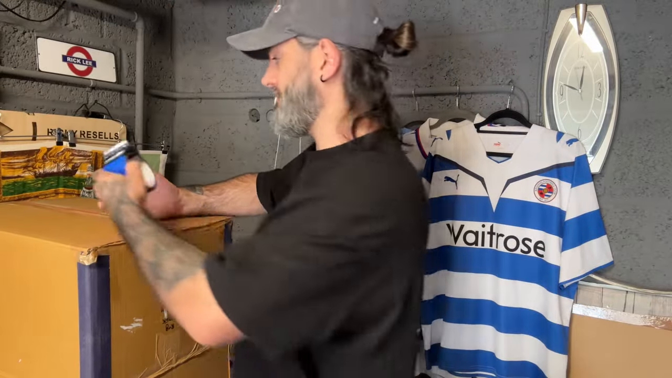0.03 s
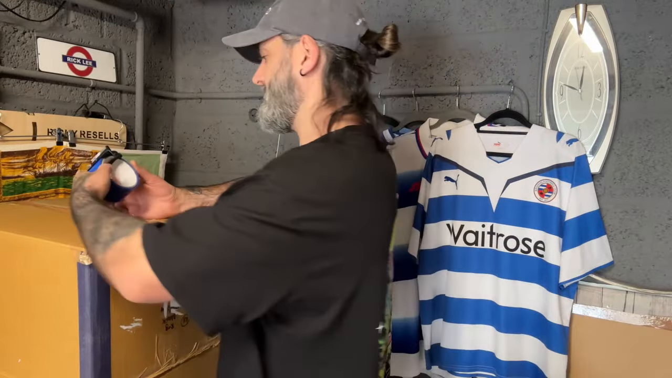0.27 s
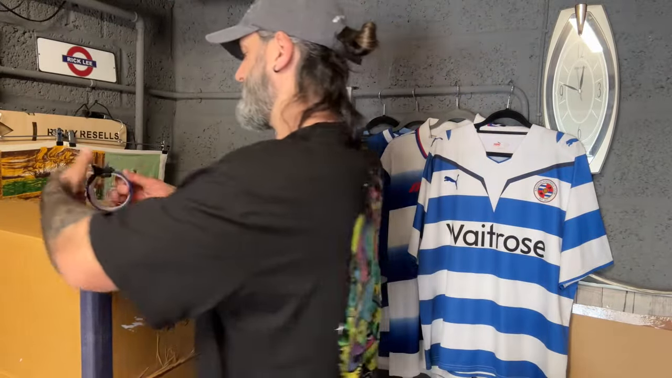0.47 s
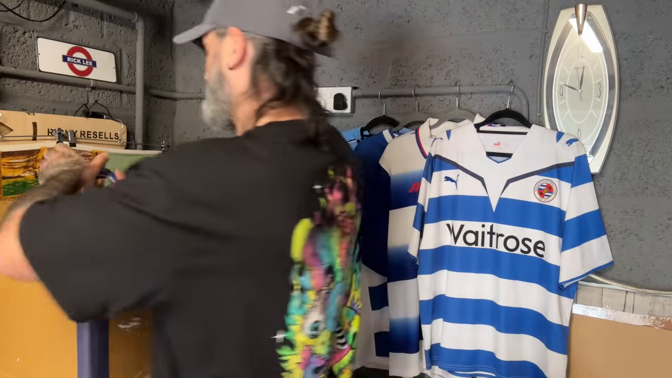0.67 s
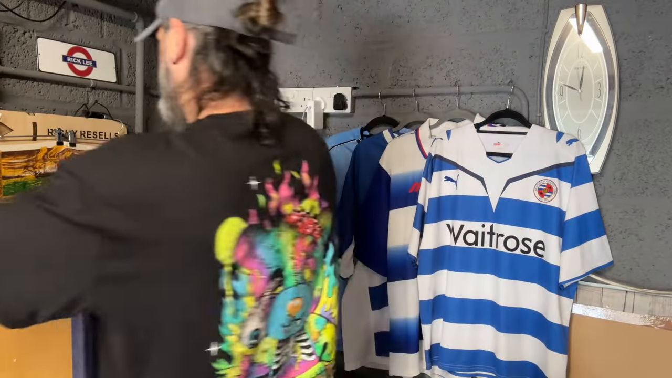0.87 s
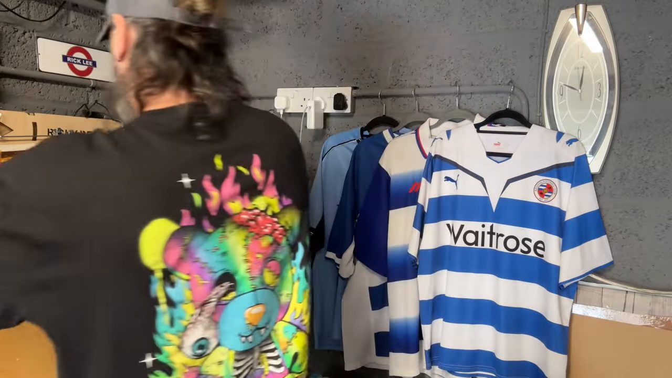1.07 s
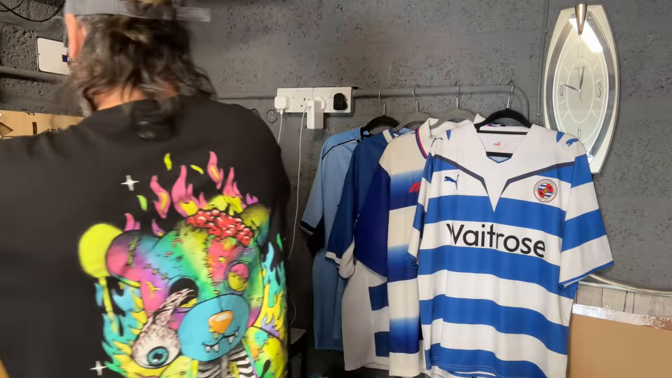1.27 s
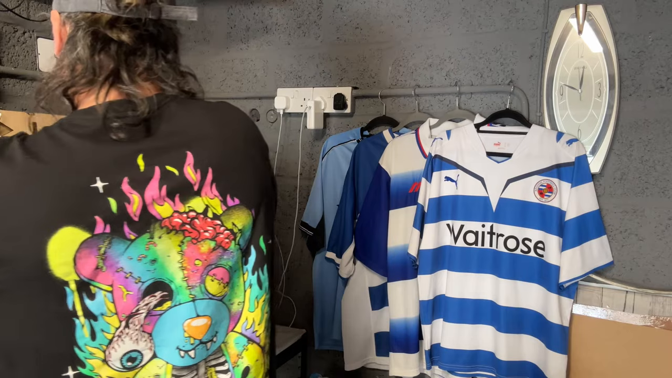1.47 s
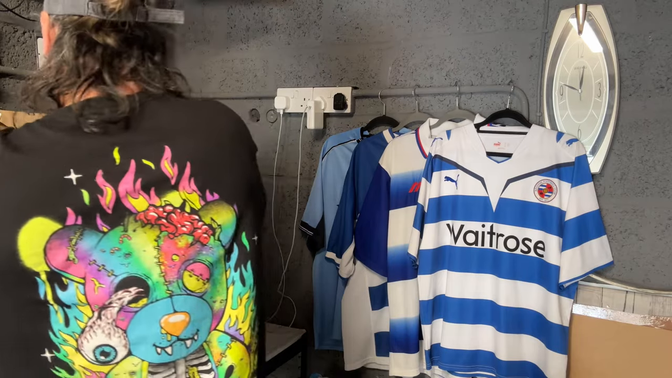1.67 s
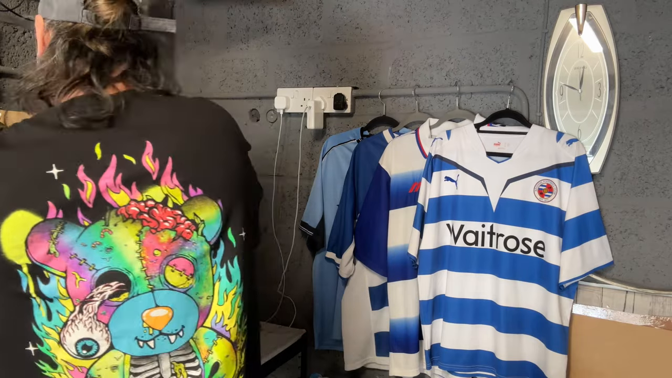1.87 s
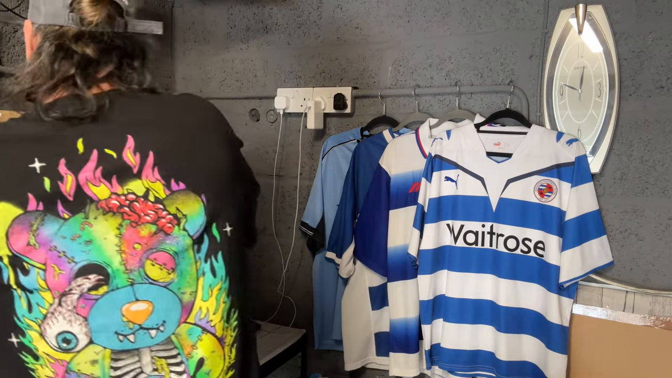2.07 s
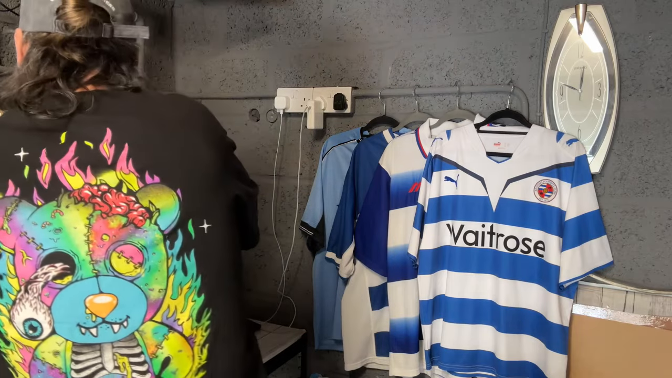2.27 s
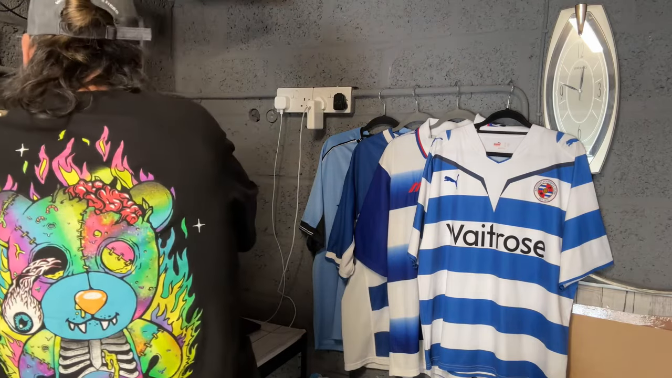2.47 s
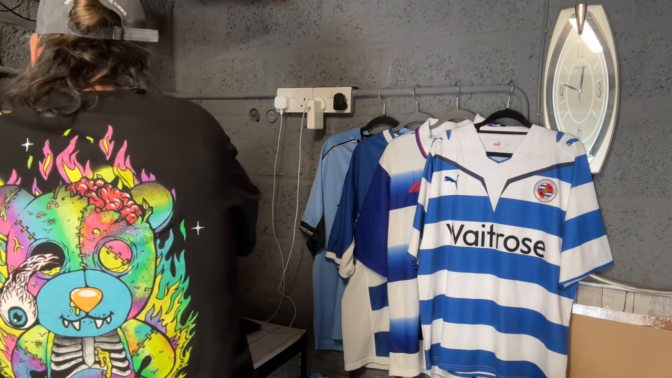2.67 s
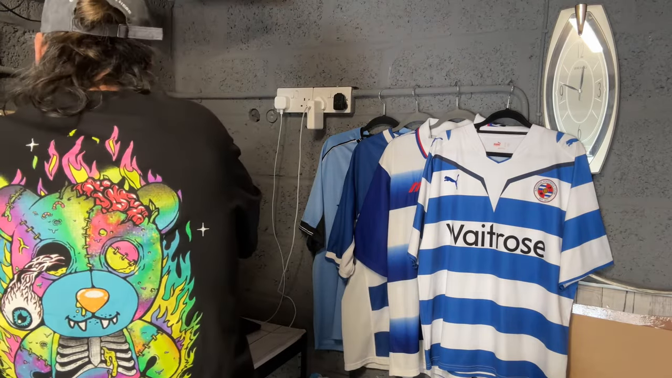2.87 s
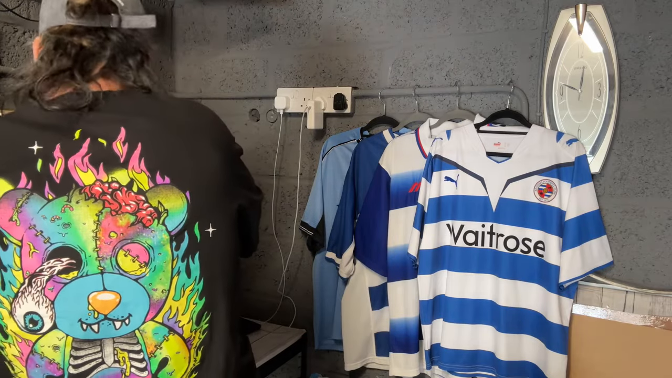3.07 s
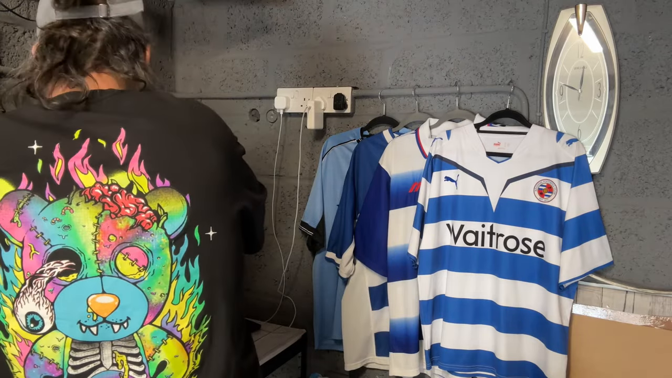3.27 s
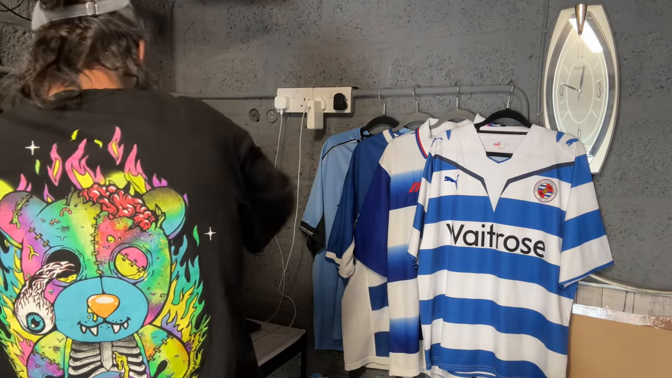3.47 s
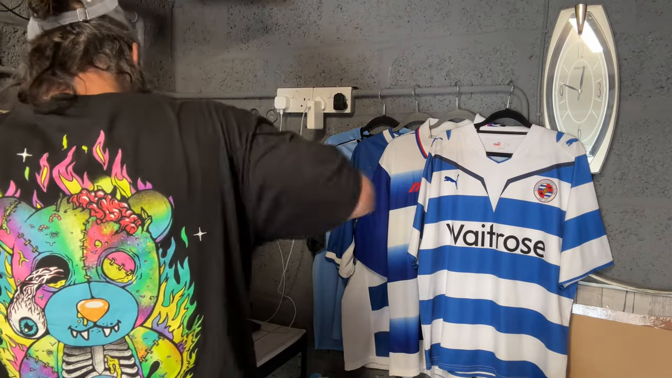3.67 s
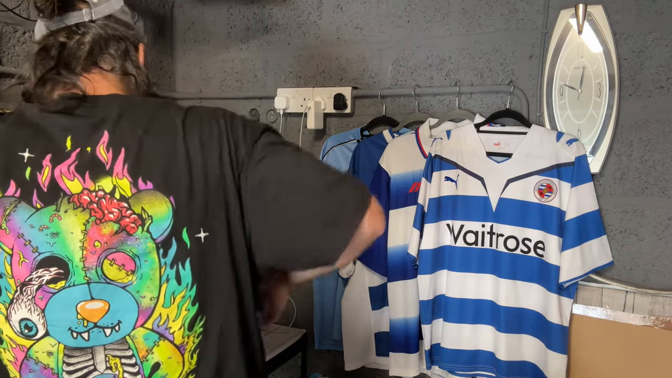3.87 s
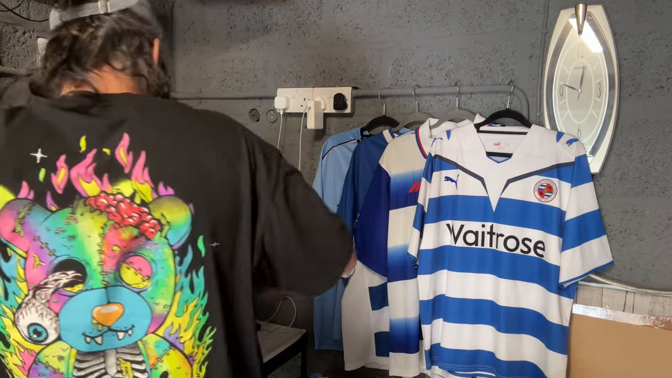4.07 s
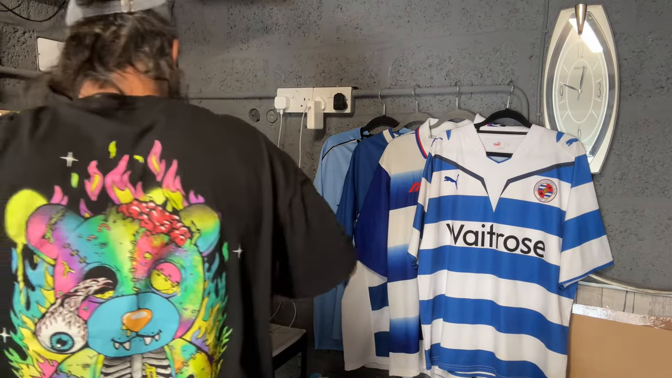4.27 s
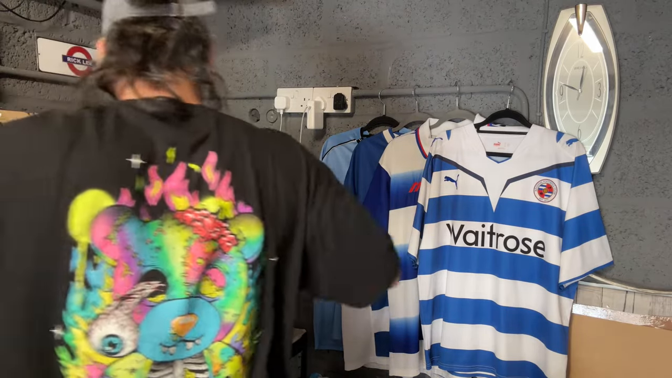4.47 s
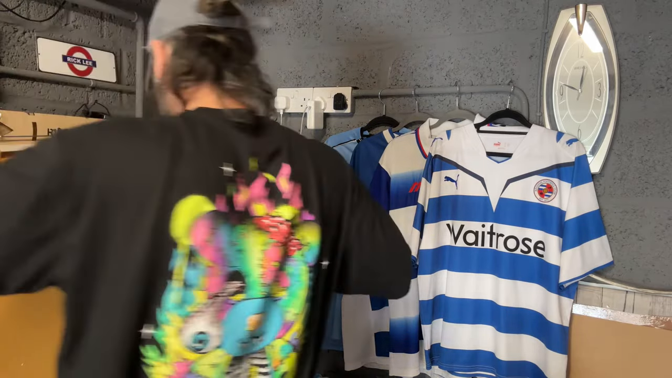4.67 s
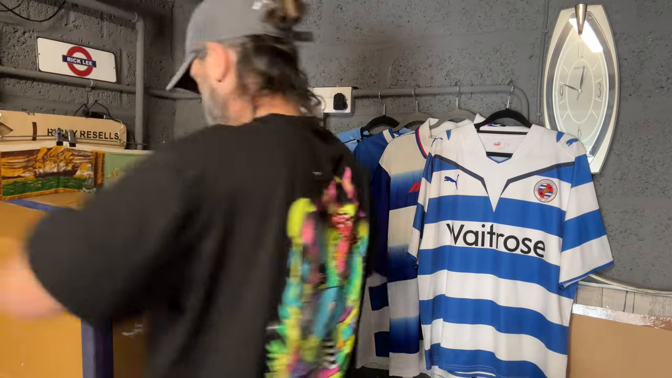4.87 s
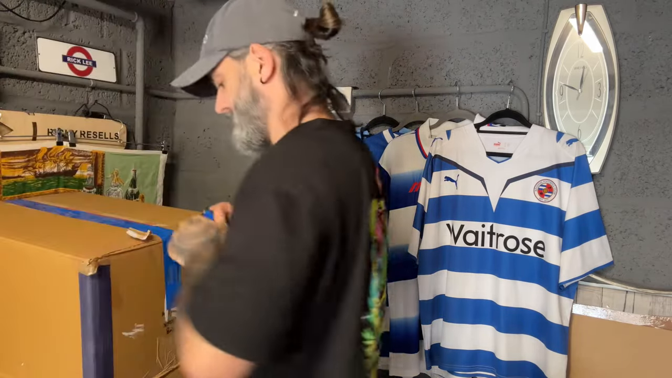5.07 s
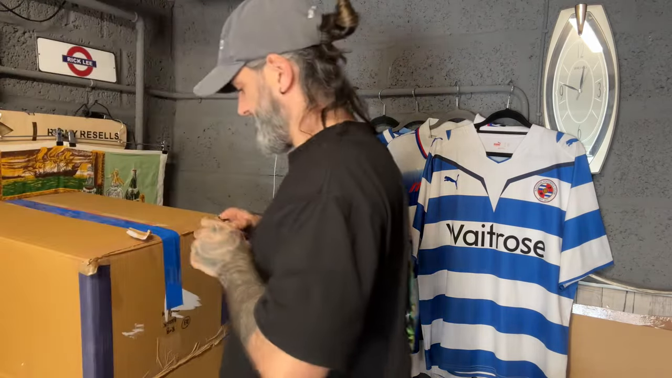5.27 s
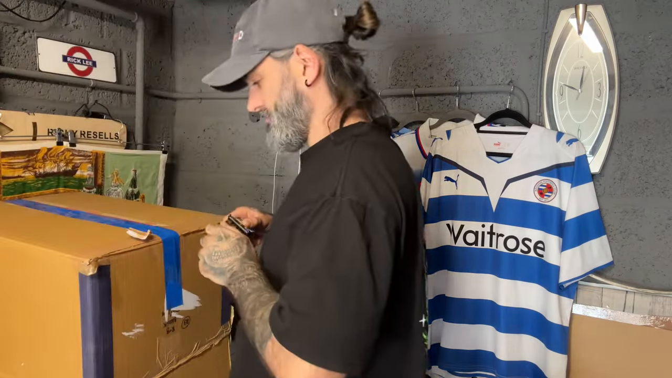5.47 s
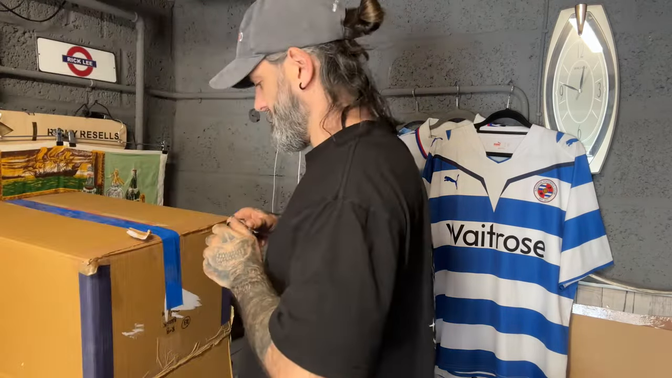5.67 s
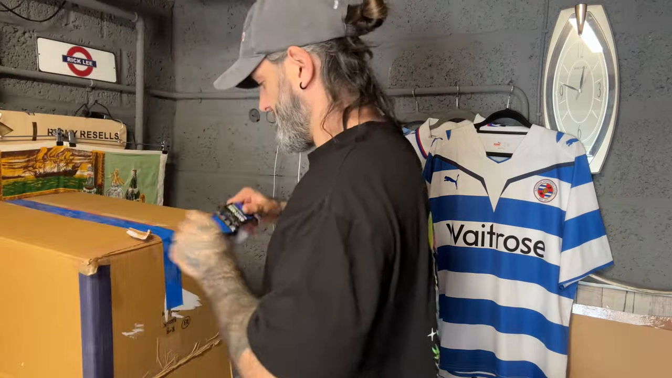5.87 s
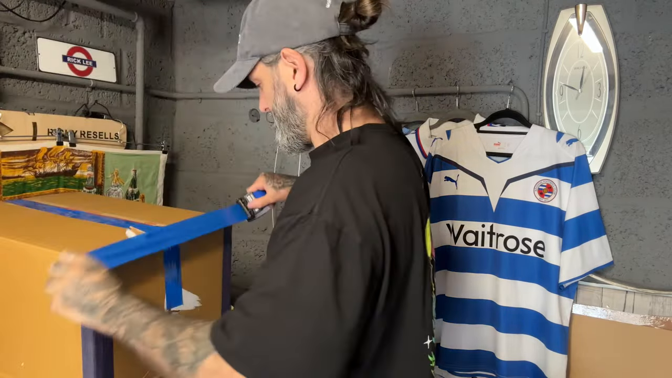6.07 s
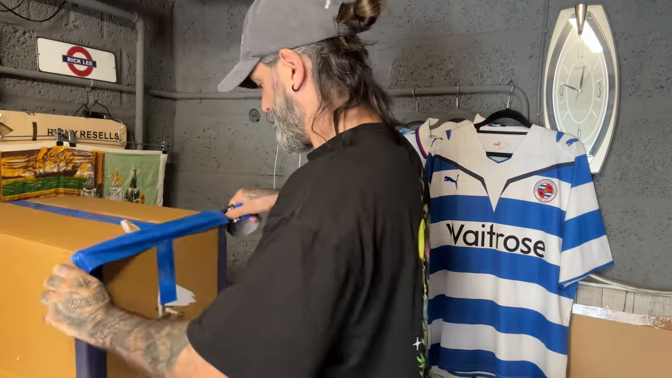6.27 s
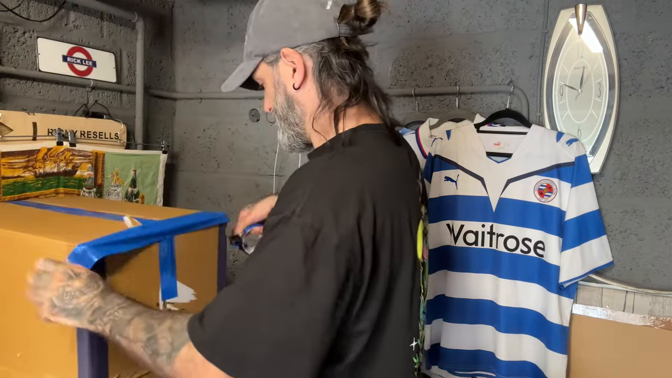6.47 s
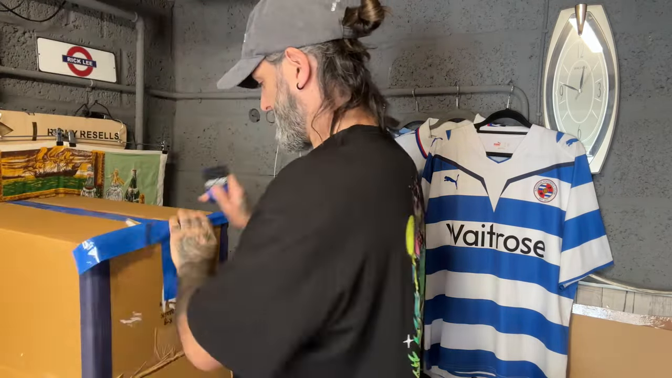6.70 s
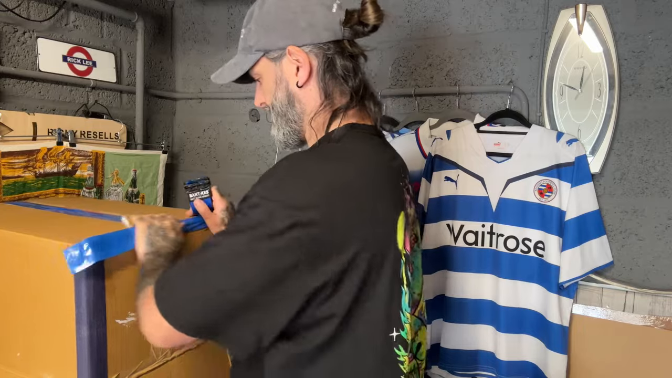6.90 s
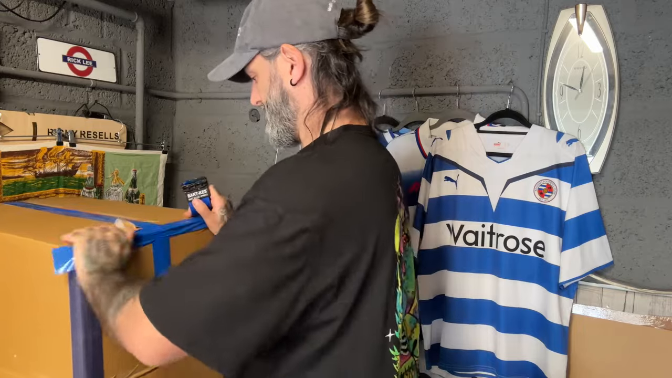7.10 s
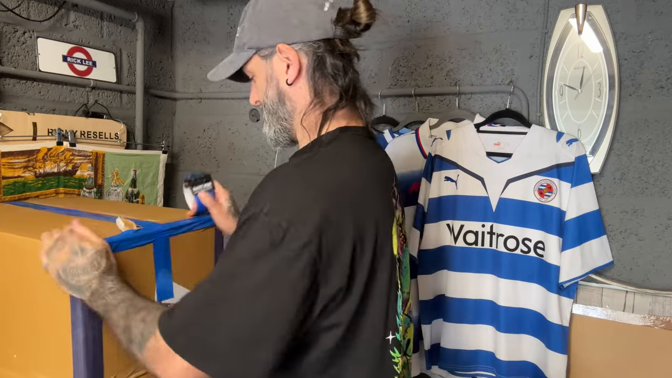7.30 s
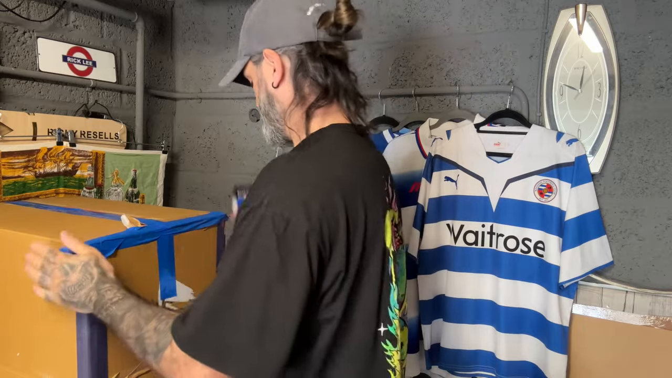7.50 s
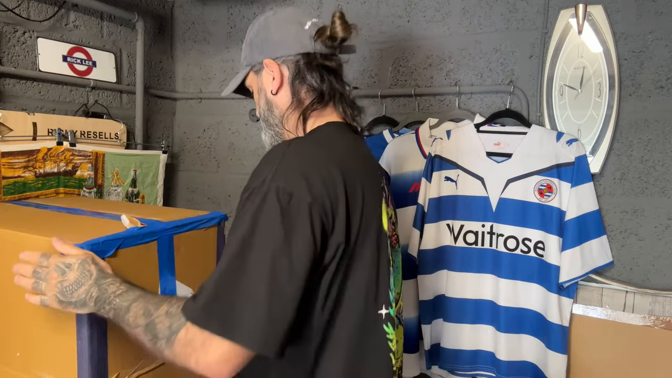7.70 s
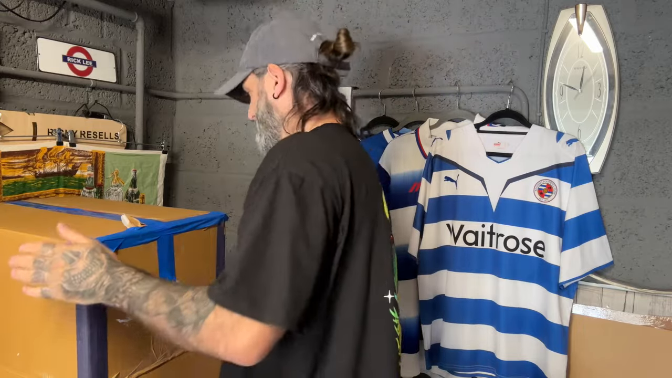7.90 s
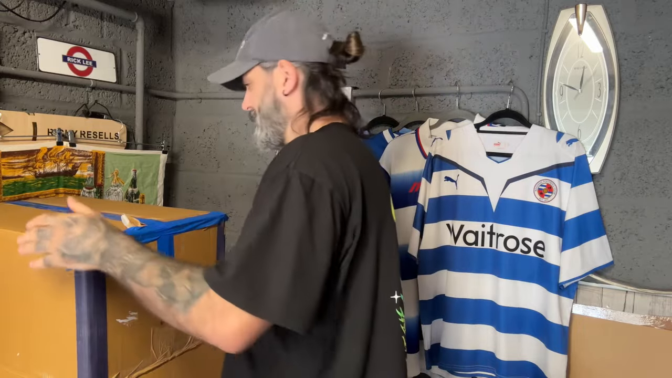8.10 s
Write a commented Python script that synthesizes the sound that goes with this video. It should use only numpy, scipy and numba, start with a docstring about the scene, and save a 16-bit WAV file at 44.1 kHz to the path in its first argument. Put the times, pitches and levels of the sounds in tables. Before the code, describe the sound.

Three harsh rips of sticky tape unrolling, spaced among soft box thumps, film crinkles and hand rubs in a small quiet garage.

```python
"""In a small garage, hands first rub and thump a big cardboard box, and loose tape crinkles.
Then parcel tape comes off its roll in three loud rips, near 2, 3.3 and 5.8 s, with more handling between.
The glue lets go in thousands of tiny snaps that ring the roll and the free strip; the strip's notes fall
as it lengthens. After the last rip the tape is smoothed on with ticks, rubs and thumps.
Faint still air lies under it all. Snaps and friction are filtered clicks; the box is a set of fading tones."""
import sys
import numpy as np
from scipy import signal
from scipy.fft import rfft, irfft, next_fast_len
from scipy.io import wavfile
from scipy.ndimage import uniform_filter1d
from numba import njit

SR = 44100
rng = np.random.default_rng(int(sys.argv[2]) if len(sys.argv) > 2 else 0)


def dump_mix(stems):
    """Bounce the given channels to the path in sys.argv[1] as a 16-bit WAV at rate SR."""
    frames = np.atleast_2d(stems).T  # one column per channel
    limited = np.clip(frames, -1, 1)  # hard clip at full scale
    pcm = np.round(limited * 32767).astype(np.int16)
    wavfile.write(sys.argv[1], SR, pcm)


N = 359062

# Long pulls of tape. The last three columns say how the lowest note of the free strip falls:
# (start [s], length [s], level [dB], change over the pull [dB], swell in mid-pull [dB],
#  lows [dB], treble at the start [dB], ring of the roll at the start [dB], box rumble [dB],
#  first strip note [Hz], last strip note [Hz], time the strip takes to lengthen [s])
PULLS = [(1.959, .25, -12.5, -12.5, -0.5, -13.5, -9.5, -20.5, -52.5, 3305, 402.2, .135),
         (3.349, 0.41, -19.5, -2.5, 3, -10, -7, -10.5, -50.5, 1591, 615, .37),
         (3.736, .092, -21.5, -6, 1.5, -11.5, -11.5, 4.5, -48.5, 560.3, 428, .1),
         (5.803, 0.26, -15.5, -8, 0.5, -14.5, -8.5, -8, -67.5, 1150, 519, .27)]

TOP_HZ = 16000  # almost nothing is heard above this
TIME = np.arange(N) / SR  # seconds
SIZE = 2 * next_fast_len(N // 2 + SR // 4, True)  # samples in a padded Fourier transform
FREQ = np.fft.rfftfreq(SIZE, 1 / SR)  # Hz


def undb(db):
    """Turn decibels into a gain."""
    return 10 ** (np.asarray(db) / 20)


def unit(x):
    """Scale a sound to an average (rms) strength of 1."""
    return x / np.sqrt(np.mean(x ** 2))


def on_log_axis(points, hz):
    """Read values between (Hz, value) points, with pitch spaced as we hear it."""
    f, value = np.transpose(points)
    return np.interp(np.log(np.maximum(hz, 1)), np.log(f), value)


def colour(x, points):
    """Filter with the given (Hz, dB) response, without sounding ahead of its input."""
    cepstrum = irfft(on_log_axis(points, FREQ) * np.log(10) / 20)
    # folding the cepstrum onto positive times keeps the response causal
    cepstrum[1:SIZE // 2] *= 2
    cepstrum[SIZE // 2:] = 0
    response = np.exp(rfft(cepstrum))
    return irfft(rfft(x, SIZE) * response)[:N]


@njit
def moving_bandpass(x, hz, width):
    """Let through a band whose centre and width may move at every sample."""
    y, band, low = np.empty(len(x)), 0., 0.
    for i in range(len(x)):
        g = np.tan(np.pi * hz[i] / SR)
        damping = width[i] / hz[i]
        v = (band + g * (x[i] - low)) / (1 + g * (g + damping))
        band = 2 * v - band
        low = low + 2 * g * v
        y[i] = damping * v
    return y


def resonate(x, hz, width):
    """Ring one resonance, fixed or moving; a narrow one rings longer."""
    return moving_bandpass(x, hz * np.ones(len(x)), width * np.ones(len(x)))


def split(x, hz):
    """Split x into the parts below and above hz."""
    low = signal.sosfiltfilt(signal.butter(3, hz, fs=SR, output="sos"), x)
    return low, x - low


def walk(rate):
    """Wander at random in straight runs between new values, rate per second, with a spread near 1.6."""
    k = max(int(SR / rate), 1)
    held = np.repeat(rng.standard_normal(N // k + 1), k)
    return 2.0 * uniform_filter1d(held, k)[:N]


def snaps(rate, spread_db):
    """Scatter tiny clicks of uneven size, about rate per second, scaled to rms 1."""
    size = undb(abs(spread_db) * np.clip(rng.standard_normal(N), -2, 2))
    happens = rng.random(N) < rate / SR
    return unit(happens * size * rng.choice([-1, 1], N))


def add(out, s, sound):
    """Mix a short sound in at time s."""
    i = int(s * SR)
    out[i:i + len(sound)] += sound[:N - i]


def piece(x, s):
    """Take the fifth of a second of x that starts at s."""
    return x[int(s * SR):][:SR // 5]


def burst(x, envelope):
    """Shape x by an envelope, with the energy that steady rms 1 would have under it."""
    shaped = x * envelope
    return shaped * np.sqrt(np.sum(envelope ** 2) / (np.sum(shaped ** 2) + 1e-18))


def stroke(start, length, change_db, attack_s, release_s, power=1):
    """One arm movement: its progress 0-1, and a gain that rises, drifts by change_db and dies away."""
    t = np.maximum(TIME - start, 0)
    progress = np.minimum(t / length, 1)
    rise = 1 - np.exp(-t / attack_s)
    fall = np.exp(-np.clip((t - length) / release_s, 0, 20))
    return progress, rise * fall * undb(change_db * progress ** power)


def strip_pitch():
    """The free strip lengthens during each pull, so its lowest note glides down."""
    hz, cut = np.zeros(N), 0
    for start, length, *_, first_hz, last_hz, glide_s in PULLS:
        glide = np.clip((TIME - start) / glide_s, 0, 1)
        hz = np.where(TIME < min(cut, start), hz, first_hz * (last_hz / first_hz) ** glide)
        cut = start + length + .5  # by then the strip is short again
    return hz


def pulling():
    """The pulling arm sets five gains: loudness, lows, treble, ring of the roll and shaking of the box."""
    attack_s, release_s = .006, .011
    tiring = 1.2  # a pull's level changes as this power of its progress
    treble_gain_db, ring_gain_db = 7.5, 3.5  # what these two gain on the rest over a pull
    gains = 0
    for start, length, db, change_db, swell_db, low_db, treble_db, ring_db, box_db, *_ in PULLS:
        progress, gain = stroke(start, length, change_db, attack_s, release_s, tiring)
        loud = undb(db + swell_db * np.sin(np.pi * progress)) * gain
        lows = loud * undb(low_db)
        treble = loud * undb(treble_db + treble_gain_db * progress)
        ring = loud * undb(ring_db + ring_gain_db * progress)
        gains = gains + np.array([loud, lows, treble, ring, gain * undb(box_db)])
    return gains


def tape():
    """Glue snaps along the peel line, in flurries; roll and stretched strip ring with it."""
    # notes of the strip: (multiple of the lowest note, level [dB])
    strip_modes = [(1, 7.5), (1.82, 7), (2.7, -2), (3.7, 0), (4.8, 2), (6, -4)]
    # notes of the roll before it sags: (frequency [Hz], width [Hz], level [dB])
    roll_modes = [(2540, 290, -3), (2760, 53, 6), (2950, 190, 0.5)]
    # colour of peeling glue: (frequency [Hz], level [dB])
    peel_colour = [(120, -46), (200, -29.5), (360, -26), (409, -24), (696, -17.5), (986, -15.5),
                   (1120, -14), (1370, -12), (1740, -6), (2380, -10.5), (2960, 2), (4350, 1.5),
                   (9400, -9.5), (15100, -7.5), (16000, -23.5)]
    # short tugs and picks at the roll:
    # (time [s], level [dB], length [s], ring of the roll [dB], lows [dB])
    tugs = [(1.881, -47, 0.0075, 3.5, -5.5), (1.89, -33, 0.0063, -11, -12.5),
            (1.951, -19.5, 0.0081, -13, -20), (1.966, -22.5, 0.0093, 1, -24),
            (3.165, -38.5, 0.0053, -1, -3), (3.168, -18, 0.0034, -9, -4.5), (3.256, -44.5, 0.017, 0, -9),
            (3.2722, -13.5, 0.0057, -2, -1), (3.287, -18.5, 0.0029, -4.5, -2.5), (3.315, -15, .012, -5, 1),
            (3.358, -19.5, .012, -7.5, 0.5), (5.456, -45, 0.002, 4, 0), (5.734, -54.5, 0.02, -4.5, -3),
            (5.766, -26, 0.0048, -4.5, -5), (5.807, -19, 0.0046, -14, -10.5),
            (5.817, -21.5, 0.0049, -6, -11)]
    flap_hz, flap_fall_db = 910, 3  # lows are best with the lowest note here; loss an octave away
    bare_ratio, bare_width = .55, .45  # weak band under the lowest note, in multiples of that note
    strip_mute_hz = 1700  # with its lowest note above this, the strip is too short to ring much

    flurries = undb(1.5 * walk(500) + 1.1 * walk(70))
    glue = snaps(rate=8000, spread_db=3.0) * flurries
    peel = unit(colour(glue, peel_colour))
    strip_hz = strip_pitch()
    sag = (strip_hz / 1000) ** 0.1  # the roll rings lower as more tape hangs from it
    roll = unit(sum(undb(db) * resonate(glue, hz * sag, width) for hz, width, db in roll_modes))

    low, upper = split(peel, hz=1700)
    middle, high = split(upper, hz=7300)
    loud, lows, sizzle, ring, _ = pulling()
    flap = lows * undb(-flap_fall_db * np.log2(strip_hz / flap_hz) ** 2)
    rip = undb(-4.5) * loud * unit(middle)
    rip = rip + undb(-7.5) * flap * unit(low)
    rip = rip + undb(-6) * sizzle * unit(high)
    rip = rip - resonate(rip, bare_ratio * strip_hz, bare_width * strip_hz)

    strip = 0
    for k, db in strip_modes:
        tension = undb(db + 2 * walk(35))  # uneven tension makes each note come and go
        strip = strip + tension * resonate(rip, np.minimum(k * strip_hz, TOP_HZ), 85 * np.sqrt(k))
    out = rip + strip / (1 + (strip_hz / strip_mute_hz) ** 2) + ring * roll

    for s, db, length, ring_db, low_db in tugs:
        tug = piece(upper, s) + undb(low_db) * piece(low, s)
        t = TIME[:len(tug)]
        jerk = np.exp(-(t / length) ** 2 / 2) * (1 - np.exp(-t / .0013))
        add(out, s, undb(db) * (burst(tug, jerk) + undb(ring_db) * burst(piece(roll, s), jerk)))
    return out


def thumps():
    """A soft push swells into the box: the whole box booms, its panels ring, its flaps knock."""
    # blows on the box: (time [s], level [dB], boom [dB], panel [dB], knock [dB], swell [s])
    pushes = [(0.412, -29.5, -7.5, -4, -12, 0.008), (0.534, -32, -9, -6, -18.5, 0.0068),
              (2.727, -23.5, -23, -12, -30, 0.015), (3.061, -12, -31, -10.5, -25.5, 0.0059),
              (3.17, -37, -10, -20, -10.5, 0.01), (3.276, -32.5, -14.5, -3, 0, 0.012),
              (3.345, -26, -22, 0.5, -9, 0.014), (4.064, -25.5, -17, -5, -21, 0.0087),
              (4.157, -37, -13.5, -8, -7.5, 0.0097), (4.22, -36, -18, -5.5, -10.5, 0.015),
              (6.225, -30.5, -10, -10, -30, 0.012), (6.325, -36, -19.5, 0.5, -15, 0.016),
              (6.775, -20.5, -6, -15.5, -37, 0.012), (7.39, -48, -2, -10, -28, 0.0094),
              (7.81, -24.5, -9, -2, -19.5, 0.011)]
    # notes of the box before random detuning: (frequency [Hz], level [dB], time to fade by 60 dB [s])
    box_modes = [(52.3, -4, 0.21), (58.3, 3.5, .36), (83.25, -3, 0.23), (140, -1.5, 0.54),
                 (137.3, -6.5, 0.25), (171.4, 1.5, .26), (212, -12.5, 0.11), (236, -1.5, 0.14),
                 (244, -4, 0.15), (320, 9, 0.1), (373, -3.5, 0.35), (394, -11, 0.3), (450, -7, 0.11),
                 (557, -12, 0.24)]
    out, t = np.zeros(N), TIME[:SR // 2]
    hz, mode_db, t60 = np.transpose(box_modes)[:, :, None]
    for s, db, boom, panel, knock, swell in pushes:
        parts = [(80, boom), (125, panel), (240, panel), (320, knock)]
        weight = undb(mode_db + on_log_axis(parts, hz))
        detune, scatter = rng.standard_normal((2, len(hz), 1))
        # the notes swing roughly together at the height of the push
        cycles = hz * (1 + .015 * detune) * (t - 1.4 * swell) + .18 * scatter
        modes = weight * np.cos(2 * np.pi * cycles) * np.exp(-np.log(1000) * t / t60)
        rise = 1 - np.exp(-(t / swell) ** 2)
        add(out, s, undb(db + 1.0) * modes.sum(0) * rise)
    return out


def crinkles():
    """The film buckles: a sharp tick and a few after-snaps, with a short rattle from the card beneath."""
    # crinkles of loose tape, levels before fixed trims:
    # (time [s], level [dB], card relative to that [dB], treble relative to that [dB], decay [s])
    buckles = [(0.131, -38.5, -15, -23, 0.0065), (0.5604, -38, -16, -11.5, 0.0089),
               (2.627, -35.5, -36, -12, 0.003), (4.155, -30, -9.5, -19, 0.015),
               (5.507, -37, -29.5, -24, 0.0075), (6.2533, -16.5, -41, -28, 0.0033),
               (6.301, -22, -23, -15.5, 0.0086), (6.325, -24.5, -16.5, -16, 0.0087),
               (6.4115, -36, -15, -12.5, 0.0069), (6.4406, -34, -9, -21, 0.0049),
               (6.4917, -33, -32.5, -16, 0.0084), (6.703, -44, -36.5, -7, 0.0034),
               (6.7575, -38, -19.5, -26, 0.0098), (6.8504, -35.5, -27.5, -14, 0.005),
               (6.946, -35, -27, -8, 0.0032), (7.2979, -42, -9.5, -10.5, 0.0022),
               (7.5058, -40, -36, -14, 0.0042), (7.6616, -42, -43, -18, 0.0016),
               (7.7514, -53, -18, -13, 0.005)]
    film = [(300, -23.5), (1500, -1.0), (4000, -5.0), (8000, 1.0), (16000, 5)]  # (Hz, dB)
    out = np.zeros(N)
    clicks = snaps(rate=3300, spread_db=2.0)
    body, top = split(colour(clicks, film), hz=6070)
    body, top = unit(body), unit(top)
    card = unit(resonate(resonate(clicks, 800, 790), 800, 790))
    for s, db, card_db, treble_db, decay in buckles:
        t = TIME[:len(piece(body, s))]
        snap = np.exp(-t / decay)
        tick = undb(-9.0) * burst(piece(body, s), snap)
        tick = tick + undb(treble_db + 12) * burst(piece(top, s), snap)
        rattle = undb(card_db - 1) * piece(card, s) * np.exp(-t / 0.013)
        rise = 1 - np.exp(-t / 0.00023)
        add(out, s, undb(db - 2.5) * (tick + rattle) * rise)
    return out


def pats():
    """Palm and fingers pat, scuff and squeak on card and tape in brief bursts of small contacts."""
    # (time [s], level [dB], centre [Hz], width of each of two filter passes [Hz], decay [s])
    touches = [(.382, -42, 1060, 348, 0.0089), (.412, -43, 610, 500, 0.008), (.53, -46, 595, 505, 0.0062),
               (1.16, -41.5, 2500, 1800, 0.013), (1.255, -44, 796, 250, 0.013),
               (1.304, -40, 1317, 355, 0.046), (3.039, -41.5, 293, 199, 0.048),
               (3.059, -35, 603, 1230, 0.0067), (3.758, -23, 378, 111, 0.0057),
               (4.059, -38.5, 591, 700, 0.0058), (4.759, -74.5, 1157, 398, 0.012),
               (4.935, -69.5, 1302, 603, 0.062), (5.089, -61.5, 2970, 401, 0.027),
               (5.22, -61, 2954, 298, 0.011), (5.302, -67, 1296, 590, 0.093),
               (6.2, -46.5, 330, 298.4, 0.034), (6.754, -45.5, 916, 1196, 0.019),
               (6.754, -28.5, 328, 201.3, 0.0058), (7.797, -22.5, 1117, 996, 0.0058),
               (7.799, -33, 1470, 303, 0.015), (7.8, -29.5, 458, 405, 0.024), (7.81, -36, 3180, 1960, 0.01)]
    out, t = np.zeros(N), TIME[:SR // 4]
    for s, db, hz, width, decay in touches:
        contacts = resonate(resonate(rng.standard_normal(len(t)), hz, width), hz, width)
        envelope = np.exp(-t / decay) * (1 - np.exp(-t / 0.00084))
        add(out, s, undb(db) * burst(contacts, envelope))
    return out


def rubbing():
    """Hands catch and slip on card and tape; the box rumbles under them and under the taut tape."""
    # strokes of hands and sleeves: (start [s], length [s], rub [dB], change over the stroke [dB],
    #  hiss relative to rub [dB], box rumble relative to rub [dB])
    strokes = [(0.0, .15, -59, -9, -3.5, 1), (0.127, 0.15, -63.5, -8, 4, 9),
               (0.264, 0.057, -55, 7.5, 0.5, -3), (0.314, 0.21, -57.5, -6, 1.5, 5.5),
               (0.557, 0.34, -60, -3.5, 1, 10), (0.845, 0.28, -52, -9, -1, 4.5),
               (1.114, 0.15, -52, -1.5, 0.5, -1.5), (1.297, 0.094, -44, -6, -0.5, -8),
               (1.388, 0.28, -55, -28.5, 3.5, 2.5), (1.647, 0.08, -58.5, 5.5, 2, 4),
               (1.766, 0.16, -57, -5.5, -3.5, 5), (2.189, 0.17, -57, -21, 9, 9),
               (2.356, 0.18, -62, -1, 0, 8), (2.553, 0.13, -54.5, -14.5, 2, 6),
               (2.709, 0.18, -47, -26.5, -1.5, 11), (2.896, 0.02, -53.5, 1.5, 1, -0.5),
               (2.96, .06, -71.5, -4, 0, 8), (3.024, 0.046, -50.5, 8.5, -2, 4.5),
               (3.097, 0.2, -56.5, -13.5, 0.5, 11.5), (3.871, 0.26, -68.5, 15.5, 5, 6),
               (4.049, 0.19, -55.5, 5.5, 0, 7), (4.26, 0.19, -70, -1, -2.5, 11.5),
               (4.42, 0.14, -68, 0, 0.5, 5.5), (4.577, 0.032, -59.5, 0.5, -3, -9.5),
               (4.933, 0.089, -71, 2.5, -8.5, -11.5), (5.073, 0.049, -71, -3.5, 1, -7),
               (5.201, 0.056, -77, -4, -3, -2), (5.285, 0.14, -70.5, 6.5, -2.5, -18),
               (5.498, 0.012, -54, -0.5, 2.5, -28), (5.54, .07, -70.5, -9.5, 1, -8),
               (5.669, 0.15, -78, 9, 11, -19), (6.11, 0.13, -58, -4.5, 1.5, -6),
               (6.174, 0.18, -54, -1, -1, 8.5), (6.362, 0.18, -57, -8, 2.5, 9.5),
               (6.522, 0.11, -71, -11.5, 2, 7), (6.683, 0.12, -60.5, 4, 2, 8),
               (6.821, 0.23, -55.5, 1.5, 5.5, 4.5), (7.036, 0.18, -58.5, -6.5, 6, 4.5),
               (7.239, .2, -62, 0, 1, 1), (7.439, 0.11, -61.5, -10, 6.5, -6),
               (7.539, 0.21, -81, -4.5, 1, 4.5), (7.65, .015, -62.5, 0.5, -9.5, -12),
               (7.747, .015, -65.5, 3.5, -9.5, -9), (7.787, 0.093, -36.5, -25, -30, -7),
               (7.931, 0.19, -58, -13, -9, 1)]
    # colours of the box rumble, the rub and the hiss: (frequency [Hz], level [dB])
    rumble_colour = [(18, -31.5), (30, -14.5), (54, 2), (126, -2.5), (199, -8.5), (240, -6.5), (502, -17),
                     (687, -19.5), (900, -26.5), (1170, -50.5), (1980, -120)]
    rub_colour = [(300, -11), (600, -0.5), (1300, 3), (2300, 1.5), (4000, -0.5), (8000, -27.5)]
    hiss_colour = [(1500, -21), (3500, -4.5), (5500, 2), (8000, -2.5), (11000, -1), (16000, -4)]
    attack_s, release_s = 0.022, 0.025
    catches_per_s, catch_db = 70, -7  # skin catches on the tape now and then with a lone tick

    grip = undb(1.0 * walk(45))
    rub, hiss, rumble = np.zeros(N), np.zeros(N), pulling()[-1]
    for start, length, db, change_db, hiss_db, rumble_db in strokes:
        _, shape = stroke(start, length, change_db, attack_s, release_s)
        gain = undb(db) * shape
        rub = np.maximum(rub, gain)
        hiss = np.maximum(hiss, gain * undb(hiss_db))
        rumble = np.maximum(rumble, gain * undb(rumble_db))
    fibres = snaps(rate=4000, spread_db=2.5)
    friction = snaps(rate=4600, spread_db=4.5)
    friction = friction + undb(catch_db) * snaps(rate=catches_per_s, spread_db=3.5)
    box = rumble * unit(colour(rng.standard_normal(N), rumble_colour))
    skin = rub * unit(colour(friction, rub_colour))
    sleeves = hiss * unit(colour(fibres, hiss_colour))
    return grip * (box + skin + sleeves)


def still_air():
    """The quiet garage is faint steady noise, strongest in the bass."""
    # colour of the air: (frequency [Hz], level [dB])
    air_colour = [(15, -36.5), (25, -0.5), (82, 12.5), (270, -24.5), (463, -17.5), (734, -27.5), (796, -26),
                  (1230, -31.5), (1840, -35.5), (2550, -36), (5880, -23.5), (10700, -36), (16000, -44.5)]
    return undb(-75.5) * unit(colour(rng.standard_normal(N), air_colour))


def echoes(wet_db):
    """Close walls give dense reflections whose lows linger longest; the deep bass passes without them."""
    # how long the garage rings: (frequency [Hz], time to fade by 60 dB [s])
    fade_times = [(250, 0.29), (1000, 0.076), (3000, 0.15), (12000, 0.12)]
    t, tail = TIME[:SR // 2], 0
    edges = np.geomspace(250, 20000, 8)  # Hz
    for lo, hi in zip(edges, edges[1:]):
        bandpass = signal.butter(3, [lo, hi], "band", fs=SR, output="sos")
        band = signal.sosfilt(bandpass, rng.standard_normal(len(t)))
        t60 = on_log_axis(fade_times, np.sqrt(lo * hi))
        tail = tail + band * np.exp(-np.log(1000) * t / t60)
    tail = tail * (1 - np.exp(-t / 0.0048))
    return undb(wet_db) * tail / np.sqrt(np.sum(tail ** 2))


def reflect(x, wet_db):
    """Direct sound plus reflections whose pattern keeps turning, so no steady notes stand out."""
    turn, sway = 2 * np.pi * 5 * TIME, 2 * np.pi * 3.1 * TIME  # 5 and 3.1 times a second
    # four shares of the sound, with steady total power, each get their own echoes
    shares = (np.cos(turn) * np.cos(sway), np.sin(turn) * np.cos(sway),
              np.cos(turn) * np.sin(sway), np.sin(turn) * np.sin(sway))
    return x + sum(signal.oaconvolve(x * share, echoes(wet_db))[:N] for share in shares)


def garage(x, wet_db):
    """The sound spreads in stereo, wide in the middle and treble. Above about 12 kHz the left and right
    channels are nearly alike."""
    # side signal (left minus right) by pitch: (frequency [Hz], side relative to mid [dB])
    side_levels = [(60, -14), (170, -14.5), (350, -7), (700, -1), (1500, -3), (2800, -1.5), (5000, -0.5),
                   (8000, 8), (9500, 1.5), (11500, -3), (14000, -39)]
    mid, side = reflect(x, wet_db), reflect(x, wet_db)
    # a side signal a quarter cycle ahead acts like a small lag: the left leads in the direct sound
    side = irfft(rfft(side, SIZE) * 1j * undb(on_log_axis(side_levels, FREQ)))[:N]
    return np.array([mid + side, mid - side]) / np.hypot(1, undb(wet_db))


def scene():
    """Tape and box in the garage, over faint still air."""
    rips = garage(tape(), wet_db=1)
    handling = thumps() + crinkles() + pats() + rubbing()
    return rips + garage(handling + still_air(), wet_db=-7.5)


def record(dry):
    """Peaks are held below .85, the deepest bass is thinned and the top is cut."""
    held = np.clip(dry, -.85, .85)
    thin = signal.sosfilt(signal.butter(2, 32, "high", fs=SR, output="sos"), held)
    return signal.sosfiltfilt(signal.ellip(8, .1, 60, TOP_HZ, fs=SR, output="sos"), thin)


dry = scene()
out = record(dry)
dump_mix(out)
```